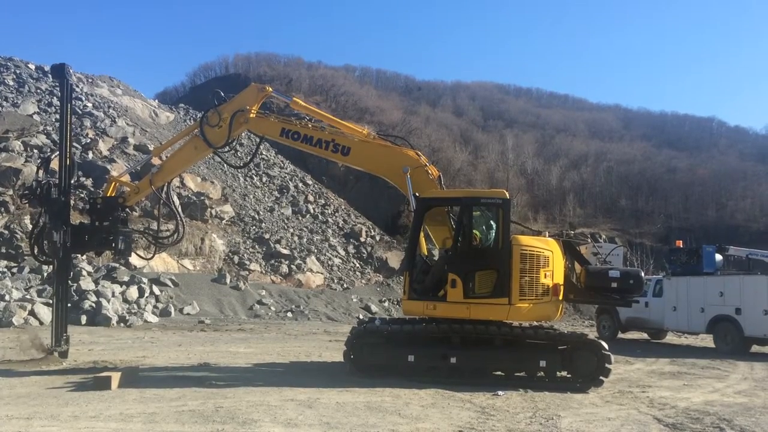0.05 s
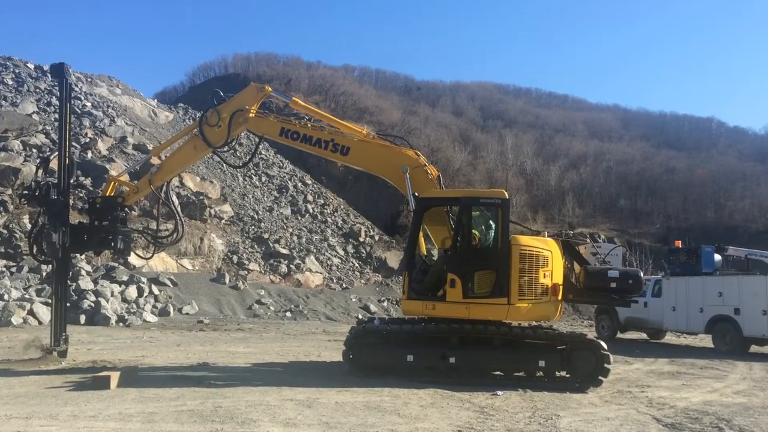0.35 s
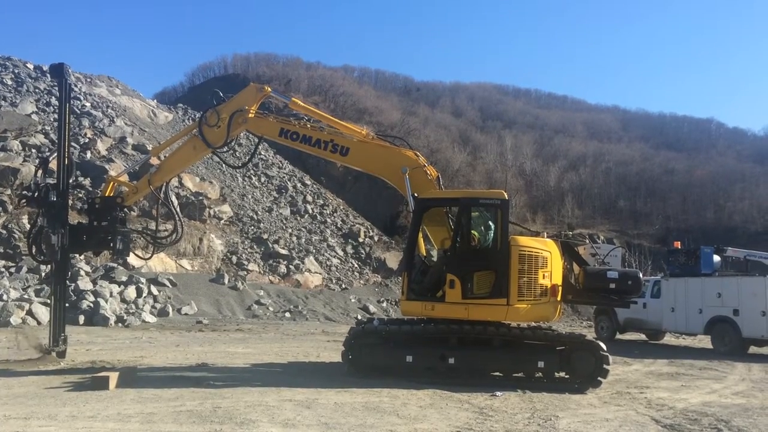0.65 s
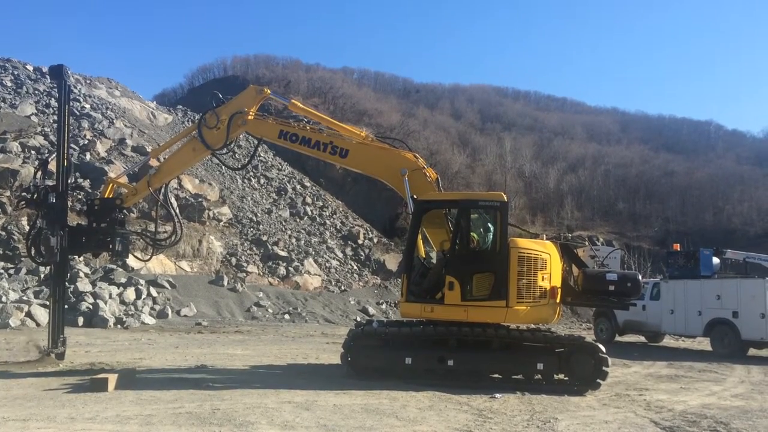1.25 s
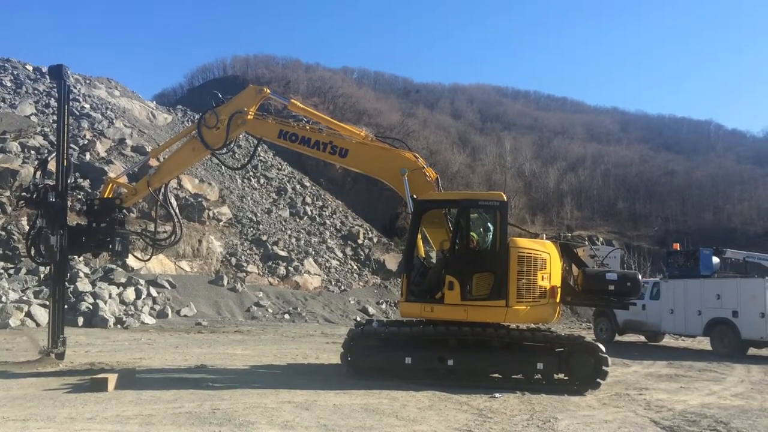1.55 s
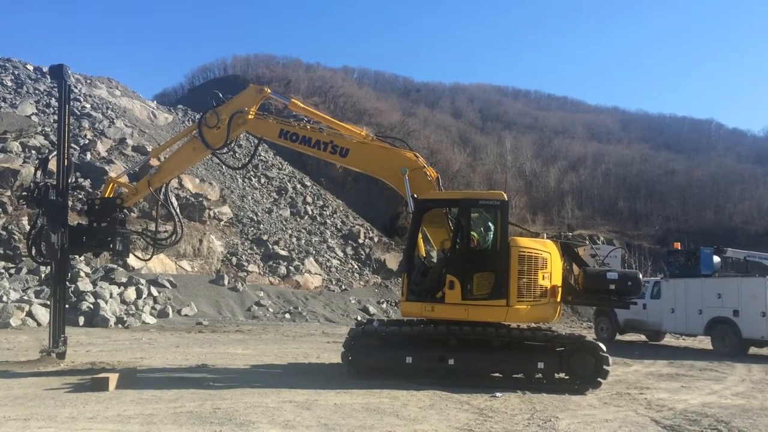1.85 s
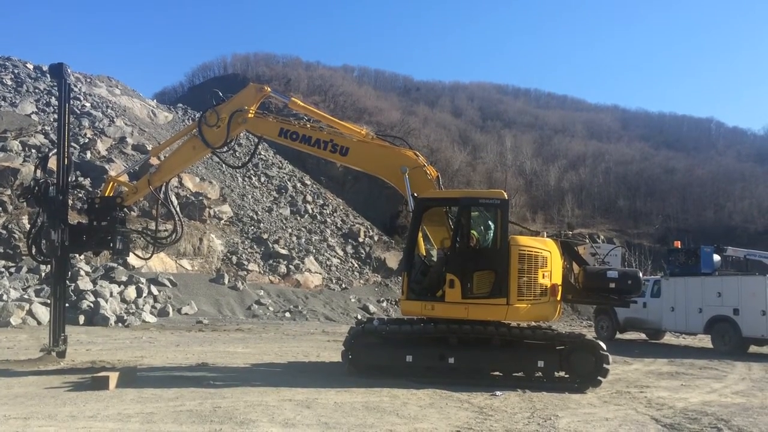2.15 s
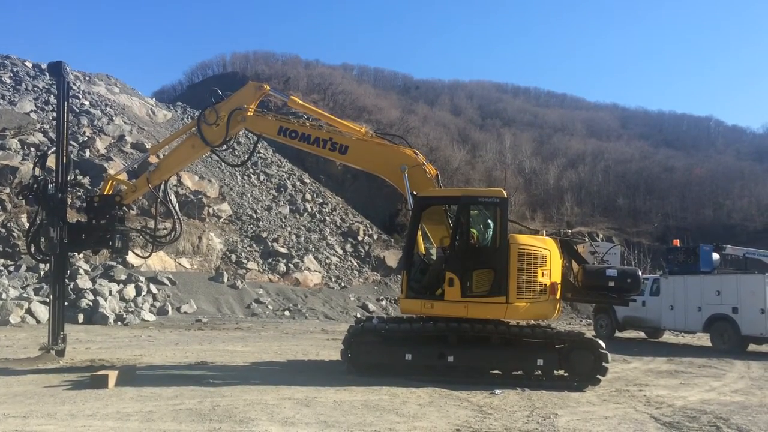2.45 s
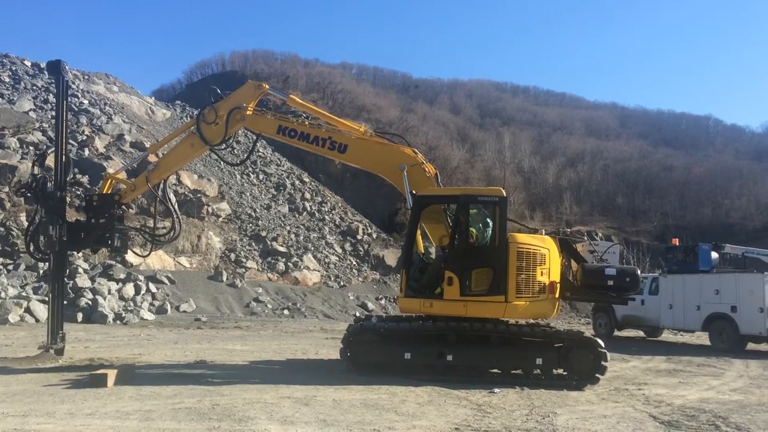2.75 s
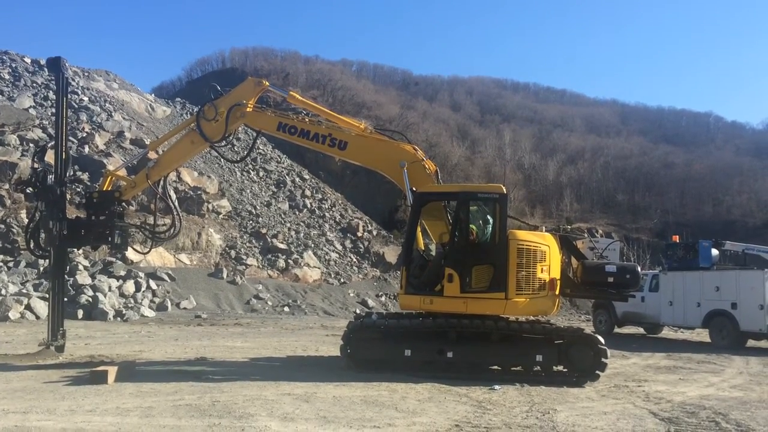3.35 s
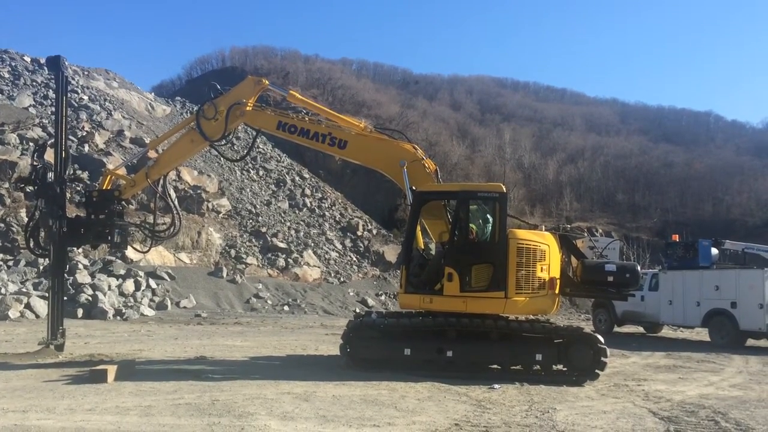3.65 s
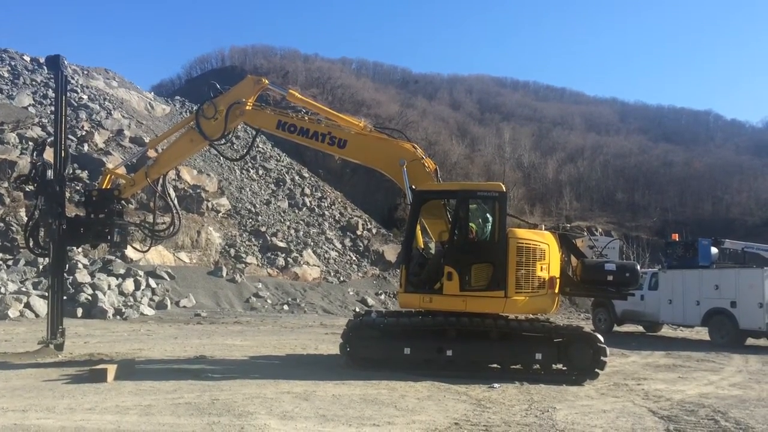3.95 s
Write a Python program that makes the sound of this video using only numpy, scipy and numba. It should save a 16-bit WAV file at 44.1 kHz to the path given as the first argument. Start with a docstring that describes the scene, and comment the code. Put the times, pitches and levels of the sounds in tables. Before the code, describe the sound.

Rapid metallic rock drill blows slow and stop while an excavator's diesel engine drones on.

```python
"""A hydraulic rock drill hammers 24 times a second over its droning diesel and pumps.
Each blow cracks with a thin high sizzle, rings the drill steel and shakes the feed mast.
The quarry returns a short wash. From 0.7 s the hammer slows and the loose steel knocks; both stop by 1 s.
The engine drones on and comes forward as the gain control lets go."""
import sys
import numpy as np
from scipy import signal
from scipy.fft import rfft, irfft
from scipy.io import wavfile
from scipy.ndimage import uniform_filter1d
from numba import njit

SR = 44100
rng = np.random.default_rng(int(sys.argv[2]) if len(sys.argv) > 2 else 0)


def inscribe(sig):
    """Save sig as 16-bit PCM at rate SR to the path in sys.argv[1].

    A 1-D sig is mono; a 2-D sig holds one channel per row.
    Samples are clipped to [-1, 1] before scaling.
    """
    pcm = np.round(np.clip(np.atleast_2d(sig).T, -1, 1) * 32767)
    wavfile.write(sys.argv[1], SR, pcm.astype(np.int16))


N = 176400

# diesel, pump and gear tones (shaft order [1], level [dB])
SHAFT_ORDERS = [(3, -33), (6, -30.5), (9, -37), (10, -36), (11, -48), (12, -46), (13, -63.5), (18, -62.5),
                (20, -52.5), (30, -50.5), (32, -53.5), (40, -57.5), (114, -55), (134, -51.5)]
# fan tones and hydraulic whines (frequency [Hz], width [Hz], level [dB])
WHINE_BANDS = [(56.4, 1, -43.5), (111.5, 1.9, -47.5), (163, 14, -42), (1765, 21, -54.5), (2774, 96, -53),
               (3263, 315, -48.5), (4180, 59, -60)]
# brief swells of the drone (time [s], rise [dB])
DRONE_THROBS = [(1.31, 4.5), (1.47, 2.4), (1.99, 5.7), (2.35, 2.2), (2.545, 3.3), (2.765, 3), (3.54, 2.5),
                (3.6, 3.2)]
# clatter treble (time [s], gain [dB])
HISS_CURVE = [(0, -0.39), (1.1, -2), (1.45, -2.9), (1.9, 1), (2.4, -0.28), (3.0, -0.6), (3.5, .5),
              (4, -0.62)]
# clatter low band (time [s], gain [dB])
GROWL_CURVE = [(0, 5), (1.25, -1.5), (1.6, -3.5), (2.55, -3.5), (2.77, 2), (3.05, -2), (3.6, 1.5), (4, 0)]
# noise spectra (frequency [Hz], relative level [dB])
CLATTER_SPECTRUM = [(200, -11), (430, -4.5), (540, 4), (800, 2.5), (1200, -1), (1700, -1.5), (2150, -9),
                    (2600, -6.5), (3000, -11), (3400, -15), (3700, -12.5), (4200, -13), (4900, -16.5),
                    (6700, -15), (9000, -23), (12000, -29), (15000, -31)]
EXHAUST_SPECTRUM = [(20, -2), (35, -8), (52, 3.5), (100, 3), (165, 1), (230, 1.5), (290, -7), (380, -9.5),
                    (700, -34.5)]
QUARRY_SPECTRUM = [(300, 11), (1500, 3.5), (3000, 0), (7000, -4.5), (15000, -9.5)]
KNOCK_SPECTRUM = [(300, -9), (560, -10), (900, 2.5), (2000, -7.5), (2800, 1), (5000, -8), (9000, -17),
                  (15000, -22)]
CRACK_SPECTRUM = [(400, -21.5), (1000, -8.5), (2000, -13.5), (2700, -9.5), (4000, -8.5), (5500, -2),
                  (7000, -2), (10000, -2.5), (12000, -6), (15000, -12.5)]
# drill steel modes, plus a thin sizzle near 12 kHz (frequency [Hz], width [Hz], relative level [dB])
STEEL_AND_SIZZLE = [(3045, 42, -10), (3174, 52, 3), (3500, 150, -8), (3760, 73, -6), (4500, 100, -1.5),
                    (4930, 56, 1.5), (5320, 83, -4.5), (5530, 100, -4), (6164, 130, -5.5), (6280, 70, 0),
                    (7090, 92, -10.5), (7170, 120, -5), (7360, 210, 1.5), (8790, 130, -7), (9980, 330, 0.5),
                    (10190, 68, -14), (12130, 120, -9), (12500, 200, -6), (13900, 200, -7)]
# strongest ring of the steel; feed mast (frequency [Hz], width [Hz], relative level [dB])
RING_MODES = [(2437, 48, 8), (2495, 52, 12.5), (2490, 68, -10)]
MAST_MODES = [(600, 48, 5), (926, 28, 2.5), (1100, 137, -1), (1249, 87, 1), (1370, 120, -10), (1836, 49, 1)]
# loose steel in its guide (time [s], relative level [dB], hold [s])
STEEL_KNOCKS = [(.8025, -0.5, 0.017), (.846, -8, 0.03), (.9085, -5, 0.007)]
# piston blows (time [s], relative level [dB], hold [s], ring offset [dB])
PISTON_BLOWS = [(.0099, -6.5, 0.024, 2.5), (0.05, -5, 0.016, 4), (.092, -4.5, 0.015, 4.5),
                (0.1337, -2, 0.013, 3), (0.1757, -3.5, .014, 1.5), (0.2176, -2, 0.011, -4),
                (0.2586, -1, .012, 0.5), (0.2998, -2.5, 0.013, -2), (0.341, -5, 0.017, -1),
                (0.3836, -4, .014, -2.5), (0.4252, -2, 0.014, -0.5), (0.4664, -3.5, 0.014, 3),
                (0.5094, -0.5, 0.011, -4), (.551, -1, .012, -2), (0.5929, -2.5, 0.013, -3.5),
                (0.6355, -3.5, 0.013, 1.5), (.678, -2, 0.0095, 0.5), (0.7242, -5, 0.014, -1.5),
                (0.7738, -7.5, 0.0066, 8.5), (0.8322, -8, 0.0035, -3), (.89, -14.5, 0.0047, 4)]

SHAFT_HZ, SHAFT_WANDER, FIRING_DEPTH = 24.52, 0.0016, 0.1
THROB_S, HISS_HZ, GROWL_HZ, GROWL_WIDTH_HZ = 0.016, 4530, 580, 310
QUARRY_DB, QUARRY_T60_S, QUARRY_DELAY_S = -14, 0.23, 0.012
ATTACK_S, SAG_S = 0.00019, 0.049
REPEAT_SHARE, GRAIN_DB, TINT_DB, TINT_STEP_HZ = 0.26, 1.1, 2, 595
CRACK_DB, STEEL_AND_SIZZLE_DB, RING_DB, MAST_DB = -6, -9, -11, -21
KNOCK_DB, KNOCK_MAST_DB = -17.5, -23
RING_HOLD_S, MAST_HOLD_S = 0.0052, 0.018
LIMIT_DB, LIMIT_START_DB, LIMIT_ATTACK_S, LIMIT_RELEASE_S = -9.5, -4, 0.0068, 0.52
CLIP_DB, LOWPASS_HZ = -0.5, 15500


def undb(db):
    """Decibels to gain."""
    return 10 ** (np.asarray(db) / 20)


def unit(x):
    """Scale to rms 1."""
    return x / np.sqrt(np.mean(x ** 2))


def noise(n=N):
    """White noise."""
    return rng.standard_normal(n)


def drift(rate_hz):
    """Smooth random drift about zero."""
    step = int(SR / rate_hz)
    stairs = np.repeat(noise()[:N // step + 1], step)
    return 1.01 * uniform_filter1d(uniform_filter1d(stairs, step), step)[:N]


def colour(x, spectrum):
    """Minimum-phase filter; keeps the power of white noise."""
    hz, db = np.array(spectrum).T
    size = 4096
    bins_hz = np.maximum(np.fft.rfftfreq(size, 1 / SR), 1)
    gain = undb(np.interp(np.log(bins_hz), np.log(hz), db))
    cepstrum = irfft(np.log(gain))
    cepstrum[1:size // 2] *= 2
    cepstrum[size // 2 + 1:] = 0
    impulse = irfft(np.exp(rfft(cepstrum)))
    return signal.fftconvolve(x, impulse / np.linalg.norm(impulse))[:N]


def resonate(x, hz, width_hz):
    """One resonance, gain 1 at centre."""
    return signal.lfilter(*signal.iirpeak(hz, hz / width_hz, fs=SR), x)


def body(x, modes):
    """Parallel resonances; roughly keeps the power of white noise."""
    power = sum(undb(db) ** 2 * np.pi * width_hz / SR for _, width_hz, db in modes)
    return sum(undb(db) * resonate(x, hz, width_hz) for hz, width_hz, db in modes) / np.sqrt(power)


def shaft_tones(shaft_rad, throb_db):
    """Firing, pump and gear tones locked to the shaft; low orders throb most."""
    tones = np.zeros(N)
    for order, db in SHAFT_ORDERS:
        rms = undb(db + drift(rate_hz=14) + throb_db * min(2 / order, 1))
        tones += rms * np.sqrt(2) * np.sin(order * shaft_rad + 2 * np.pi * rng.random())
    return tones


def diesel_clatter(t, shaft_rad):
    """Six cylinders pulse the noise three times a turn; treble and low band swell and fade."""
    pulsing = noise() * (1 + FIRING_DEPTH * np.cos(3 * shaft_rad))
    clatter = undb(-35 + 1.03 * drift(rate_hz=13)) * colour(pulsing, CLATTER_SPECTRUM)
    hiss = signal.sosfiltfilt(signal.butter(2, HISS_HZ, "high", fs=SR, output="sos"), clatter)
    growl = resonate(clatter, GROWL_HZ, GROWL_WIDTH_HZ)
    for band, curve in (hiss, HISS_CURVE), (growl, GROWL_CURVE):
        gain = undb(np.interp(t, *np.array(curve).T))
        clatter += band * (gain - 1)
    return clatter


def whines():
    """Fan and hydraulics: narrow noise bands."""
    return sum(undb(db) * unit(resonate(resonate(noise(), hz, width_hz), hz, width_hz))
               for hz, width_hz, db in WHINE_BANDS)


def engine():
    """Governed diesel with pumps: tones, clatter, exhaust rumble, whines."""
    t = np.arange(N) / SR
    shaft_hz = SHAFT_HZ * (1 + SHAFT_WANDER * drift(rate_hz=5.11))
    shaft_rad = 2 * np.pi * np.cumsum(shaft_hz) / SR
    throb_db = sum(db * np.exp(-((t - at_s) / THROB_S) ** 2) for at_s, db in DRONE_THROBS)
    tones = shaft_tones(shaft_rad, throb_db)
    clatter = diesel_clatter(t, shaft_rad)
    exhaust = undb(-35.5 + throb_db + drift(rate_hz=9)) * colour(noise(), EXHAUST_SPECTRUM)
    return tones + clatter + exhaust + whines()


def quarry(x):
    """Short dull wash off the ground and rock pile."""
    t = np.arange(N) / SR - QUARRY_DELAY_S
    tail = colour(noise(), QUARRY_SPECTRUM) * (t > 0) * undb(-60 * np.maximum(t, 0) / QUARRY_T60_S)
    return undb(QUARRY_DB) * signal.fftconvolve(x, tail / np.linalg.norm(tail))[:N]


def grains(n):
    """Rough noise: new level every 10 samples."""
    return unit(noise(n) * undb(GRAIN_DB * np.repeat(noise(n // 10), 10)))


def chatter(events, release_s):
    """Bursts of dense metal contacts: sharp attack, sagging hold, release; each with its own tint."""
    out, n = np.zeros(N), SR // 10
    t, bins_hz = np.arange(n) / SR, np.fft.rfftfreq(n, 1 / SR)
    repeated = np.sqrt(REPEAT_SHARE) * grains(n)
    for at_s, db, hold_s in events:
        tint = undb(TINT_DB * np.interp(bins_hz / TINT_STEP_HZ, np.arange(200), noise(200)))
        fresh = np.sqrt(1 - REPEAT_SHARE) * grains(n)
        contacts = unit(irfft(tint * rfft(repeated + fresh)))
        attack = 1 - np.exp(-t / ATTACK_S)
        decay = np.exp(-t / SAG_S - np.maximum(t - hold_s, 0) / release_s)
        start = int(at_s * SR)
        out[start:start + n] += undb(db) * attack * decay * contacts
    return out


def loose_steel():
    """The steel knocks in its guide and excites the lowest mast mode."""
    knocks = chatter(STEEL_KNOCKS, release_s=0.01)
    mast = undb(KNOCK_MAST_DB) * body(knocks, MAST_MODES[:1])
    return undb(KNOCK_DB) * colour(knocks, KNOCK_SPECTRUM) + mast


def hammer():
    """Each piston blow cracks with a thin high sizzle, rings the steel and shakes the mast."""
    strikes = [(at_s, db, hold_s) for at_s, db, hold_s, _ in PISTON_BLOWS]
    rings = [(at_s, db + offset_db, RING_HOLD_S) for at_s, db, _, offset_db in PISTON_BLOWS]
    shakes = [(at_s, db * 0.5, MAST_HOLD_S) for at_s, db, _, _ in PISTON_BLOWS]
    crack = undb(CRACK_DB) * colour(chatter(strikes, release_s=0.0043), CRACK_SPECTRUM)
    contacts = chatter(strikes, release_s=0.0043)
    steel_and_sizzle = undb(STEEL_AND_SIZZLE_DB) * body(contacts, STEEL_AND_SIZZLE)
    ring = undb(RING_DB) * body(chatter(rings, release_s=0.0034), RING_MODES)
    mast = undb(MAST_DB) * body(chatter(shakes, release_s=0.013), MAST_MODES)
    return crack + steel_and_sizzle + ring + mast


def scene():
    """Drill and its wash over the engine, mono."""
    drill = hammer() + loose_steel()
    return (drill + quarry(drill) + engine())[None]


@njit
def follow(x, level, attack_s, release_s):
    """One-pole level follower with separate rise and fall times."""
    out = np.empty(len(x))
    for i in range(len(x)):
        lag_s = attack_s if x[i] > level else release_s
        level += (x[i] - level) / (lag_s * SR)
        out[i] = level
    return out


def record(dry):
    """Gain control starts engaged, holds the hammering down, recovers; then soft clip and low-pass."""
    level = follow(np.abs(dry[0]), float(undb(LIMIT_START_DB)), LIMIT_ATTACK_S, LIMIT_RELEASE_S)
    held = dry * np.minimum(undb(LIMIT_DB) / level, 1)
    rounded = held / (1 + (held / undb(CLIP_DB)) ** 4) ** (1 / 4)
    return signal.sosfilt(signal.ellip(10, 0.2, 80, LOWPASS_HZ, fs=SR, output="sos"), rounded)


dry = scene()
out = record(dry)
inscribe(out)
```